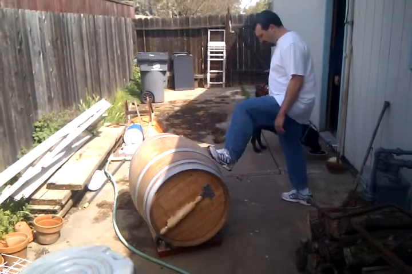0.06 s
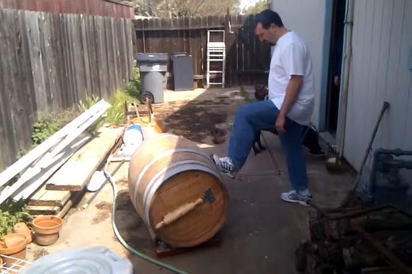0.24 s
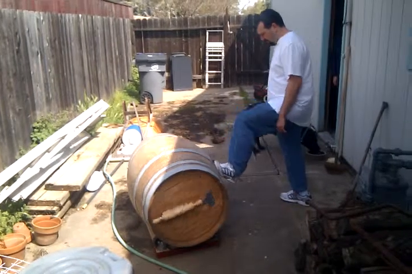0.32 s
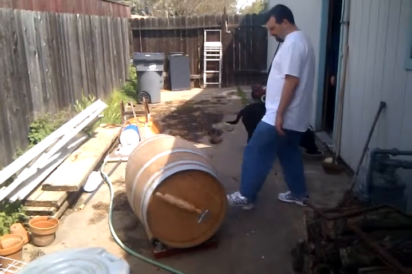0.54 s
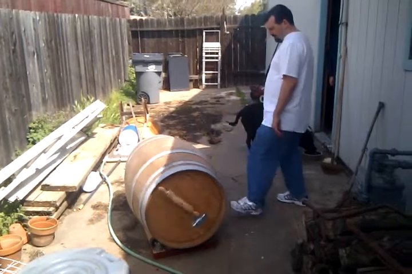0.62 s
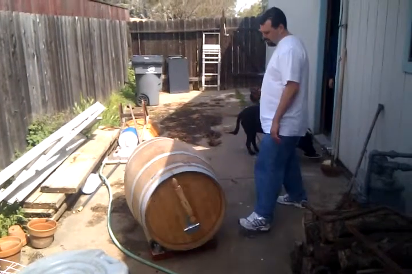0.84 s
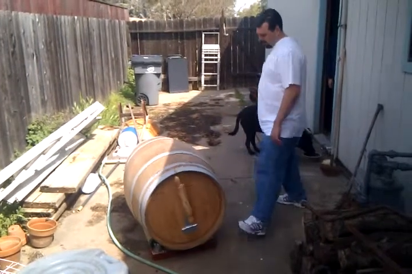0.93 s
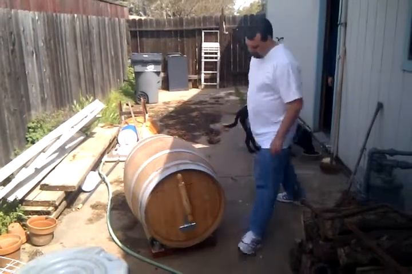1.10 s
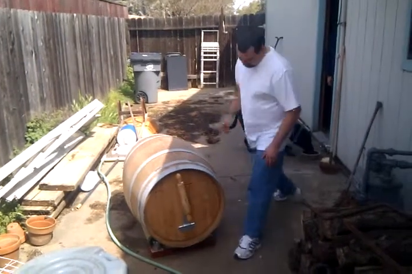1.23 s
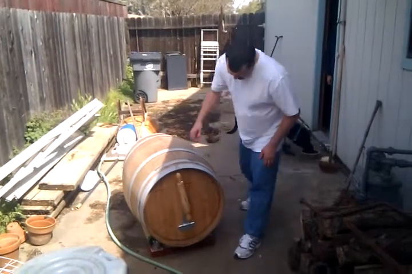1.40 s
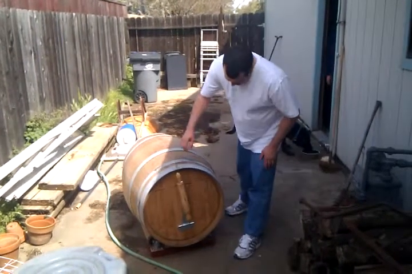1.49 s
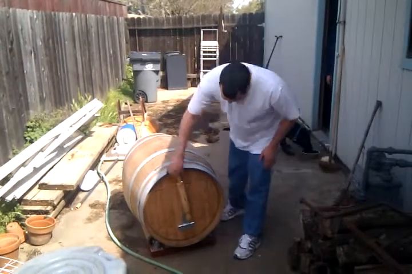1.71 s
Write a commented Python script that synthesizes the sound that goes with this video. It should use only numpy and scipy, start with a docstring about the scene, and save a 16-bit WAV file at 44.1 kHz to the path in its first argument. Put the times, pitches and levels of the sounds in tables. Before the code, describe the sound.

Hollow rumbling and thumping of a wooden barrel turning on its stand, with scuffing shoes.

```python
"""A hollow rumble swells over a faint motor hum: a wooden barrel, pushed by a foot, turns on its cradle.
It grinds, thumps against the support and stops with a clack, each contact exciting damped modes of
its body, staves and hoops. Shoes scuff the concrete by friction, during the roll and after it.
The narrow back yard adds short echoes, and a narrow-band recorder clips the highest peaks."""
import sys
import numpy as np
from scipy import signal
from scipy.fft import rfft, irfft
from scipy.io import wavfile
from scipy.ndimage import uniform_filter1d

SR = 44100
rng = np.random.default_rng(int(sys.argv[2]) if len(sys.argv) > 2 else 0)


def dump(signal):
    """Clip the signal to [-1, 1] and save it as 16-bit WAV at the path in sys.argv[1]."""
    limited = np.clip(np.atleast_2d(signal).T, -1, 1)
    pcm = np.round(limited * 32767).astype(np.int16)
    wavfile.write(sys.argv[1], SR, pcm)


N = 77175
T = np.arange(N) / SR

# Spectrum of the outdoor noise: f/Hz, relative level/dB
AIR_SPECTRUM = [(25, -46.5), (60, -12), (140, -13.5), (200, -4), (290, -3.5), (390, -2.5), (520, 1),
                (700, -2), (1050, -5.5), (1300, -3), (1700, -7.5), (2100, -12), (3200, -16.5), (3700, -15),
                (4400, -26.5)]
# Partials of the motor: f/Hz, level/dB
MOTOR_PARTIALS = [(291, -52.5), (698.5, -51), (721, -53.5), (1047, -48), (1164, -54.5), (1395, -60)]
# Envelope of the soft shuffling: t/s, level/dB
SHUFFLE_ENVELOPE = [(1.38, -82), (1.45, -44.5), (1.51, -39), (1.57, -59), (1.64, -36), (1.70, -42),
                    (1.75, -47)]
# Spectrum of the shuffling: f/Hz, relative level/dB
SHUFFLE_SPECTRUM = [(200, -19), (450, -41.5), (720, 11.5), (1100, -9.5), (1650, 7), (2300, -12.5),
                    (4000, -26)]
# Shoes scuffing and landing: t/s, length/s, sole f/Hz, sole level/dB, rasp level/dB, release/s
SCUFFS = [(.065, 0.0086, 1030, -33, -46, 0.012), (0.422, 0.0076, 934.3, -18, -30.5, 0.0066),
          (.983, 0.021, 993, -32, -33.5, 0.0078), (1.392, 0.008, 976, -29.5, -32.5, 0.03),
          (1.601, 0.021, 758, -43, -34.5, .018), (1.726, 0.003, 1000, -36, -30, 0.016)]
# Rolling excitation: t/s, body rumble level/dB, stave grinding level/dB, edge grit level/dB
ROLL_ENVELOPE = [(0, -40, -39.5, -46.5), (.06, -41.5, -50.5, -52.5), (.09, -33.5, -31, -50.5),
                 (.135, -30.5, -45.5, -49), (.20, -33, -36.5, -47), (.25, -29.5, -35, -42.5),
                 (.29, -23.5, -29.5, -38.5), (.40, -20.5, -24.5, -45), (.445, -18.5, -20, -32.5),
                 (.50, -18.5, -26.5, -34.5), (.55, -26.5, -25.5, -42.5), (.65, -22, -23, -38),
                 (.69, -24.5, -27.5, -61.5), (.75, -26, -32.5, -37.5), (.785, -27, -22.5, -34.5),
                 (.865, -26, -28, -34.5), (.90, -34, -34, -41), (.97, -37, -36, -43),
                 (1.12, -57, -47, -50.5)]
# Knocks on the cradle: t/s, body level/dB, stave level/dB, edge level/dB
CRADLE_KNOCKS = [(0.135, -32, -37.5, -86), (0.206, -25.5, -43.5, -52.5), (0.278, -25, -33, -39.5),
                 (.351, -18, -29.5, -46), (.376, -13.5, -37, -37.5), (.432, -14.5, -14.5, -28.5),
                 (0.444, -28.5, -20.5, -33), (0.463, -19, -27, -16.5), (.472, -16.5, -14.5, -28),
                 (.482, -22.5, -17.5, -26), (.494, -16, -23.5, -31), (.507, -22, -19.5, -26),
                 (.521, -22, -20, -37), (0.572, -21, -31.5, -40.5), (.636, -26, -30, -31.5),
                 (.722, -18, -32.5, -41.5), (.848, -31, -27.5, -21.5), (.866, -24.5, -26, -33)]
# Modes of the hollow body and heads: f/Hz, relative level/dB, T60/s
BODY_RESONANCES = [(64, -23, 0.072), (124, -21.5, 0.073), (227.8, -4, 0.079), (276.1, -0.5, 0.099),
                   (319, -2, 0.067), (398, -5.5, 0.032)]
# Modes of the staves: f/Hz, relative level/dB, T60/s
STAVE_RESONANCES = [(433.4, -6.5, 0.12), (520, -12, 0.028), (552, 0.5, .05), (605, -2, 0.062),
                    (674.6, 4.5, 0.034), (760, 3, .06), (780, -8, 0.042), (918, 2, .06),
                    (967.8, -3.5, 0.18), (1039, 0.5, .05), (1152, -9, 0.069), (1470, -1.5, 0.066),
                    (1632, -4, 0.09), (1785, -5.5, 0.022)]
# Modes of the hoops and hard edges: f/Hz, relative level/dB, T60/s
EDGE_RESONANCES = [(2210, -23, 0.076), (2465, 8, 0.072), (2559, 15, 0.013), (2810, -2, .03),
                   (3126, 10.5, 0.017), (3387, 0.5, .03)]


def amp(db):
    """Amplitude grows tenfold for every 20 dB."""
    return 10 ** (np.asarray(db) / 20)


def unit_rms(x):
    """Normalisation to a mean power of 1."""
    return x / np.sqrt(np.mean(x ** 2))


def unit_energy(x):
    """Normalisation to a total energy of 1."""
    return x / np.sqrt(np.sum(x ** 2))


def envelope(table, column=1):
    """Gain over time, by linear interpolation of one column of levels."""
    rows = np.array(table)
    return amp(np.interp(T, rows[:, 0], rows[:, column]))


def decay(t60):
    """Exponential damping: a fall of 60 dB in t60 seconds."""
    return np.exp(-np.log(1000) * T / t60)


def ring(force, response):
    """A linear system convolves its input with its impulse response."""
    return signal.fftconvolve(force, response)[:N]


def band_noise(lo_hz, hi_hz):
    """Band-pass filtering of white noise, at rms 1."""
    band = signal.butter(2, [lo_hz, hi_hz], "band", fs=SR, output="sos")
    return unit_rms(signal.sosfilt(band, rng.standard_normal(N)))


def coloured_noise(spectrum):
    """Spectral shaping of white noise, at rms 1."""
    hz, db = np.array(spectrum).T
    bins_hz = np.maximum(np.arange(N // 2 + 1) * SR / N, 1)
    gain = amp(np.interp(np.log(bins_hz), np.log(hz), db))
    return unit_rms(irfft(rfft(rng.standard_normal(N)) * gain, N))


def wander(per_s):
    """Moving averages smooth random steps into a drift of rms 1."""
    span = int(SR / per_s)
    steps = np.repeat(rng.standard_normal(N // span + 1), span)[:N]
    return unit_rms(uniform_filter1d(uniform_filter1d(steps, span), span))


def impulses(per_s, spread_db):
    """A Poisson process: independent impulses of uneven size and random sign, at rms 1."""
    size = amp(spread_db * np.minimum(rng.exponential(size=N), np.pi))
    occurs = rng.random(N) < per_s / SR
    return unit_rms(occurs * size * np.sign(rng.standard_normal(N)))


def outdoor_air():
    """Broadband ambient noise with slight random amplitude modulation."""
    return coloured_noise(AIR_SPECTRUM) * amp(-40 - .45 * wander(per_s=12))


def motor_hum(drift_hz=1.53):
    """A distant motor radiates a line spectrum; each partial wavers in frequency and level."""
    hum = np.zeros(N)
    for hz, db in MOTOR_PARTIALS:
        phase = 2 * np.pi * np.cumsum(hz + drift_hz * wander(per_s=5.54)) / SR
        hum += np.sqrt(2) * amp(db - wander(per_s=11)) * np.sin(phase)
    return hum


def yard(direct, echo_db=-21, delay_s=.009, low_cut_hz=370):
    """Reflection from fence and house wall adds scattered echoes, thin in the bass."""
    echoes = impulses(per_s=1500, spread_db=3) * (T > delay_s) * decay(t60=.46)
    echoes = signal.sosfilt(signal.butter(2, low_cut_hz, "high", fs=SR, output="sos"), echoes)
    return direct + amp(echo_db) * ring(direct, unit_energy(echoes))


def shuffling():
    """Light sliding friction of the shoes makes a soft noise that swells and fades."""
    return coloured_noise(SHUFFLE_SPECTRUM) * envelope(SHUFFLE_ENVELOPE)


def scuffs(attack_s=.0015, drift_hz=60, half_band_hz=275, rasp_fade_s=.072):
    """Friction on concrete draws a hollow squawk from the sole and a sandy rasp that fades first."""
    out = np.zeros(N)
    for start, length, hz, sole_db, rasp_db, release in SCUFFS:
        age = np.maximum(T - start, 0)
        shape = np.minimum(age / attack_s, 1) * np.exp(-np.maximum(age - length, 0) / release)
        phase = 2 * np.pi * np.cumsum(hz + drift_hz * wander(per_s=300)) / SR
        rubbing = band_noise(hz - half_band_hz, hz + half_band_hz)
        sole = unit_rms(unit_rms(np.sin(phase)) + amp(-3) * rubbing)
        rasp = band_noise(2340, 3740) * np.exp(-age / rasp_fade_s)
        out += shape * (amp(sole_db) * sole + amp(rasp_db) * rasp)
    return out


def knocks(column, chatter_s=.004, span_s=.015):
    """Each impact on the cradle is an impulsive force followed by brief contact chatter."""
    force = np.zeros(N)
    for knock in CRADLE_KNOCKS:
        blow = amp(1) * unit_energy(rng.standard_normal(N) * np.exp(-T / chatter_s))
        blow[0] = 1  # the first sharp contact
        start = int(knock[0] * SR)
        strength = amp(knock[column]) * np.sqrt(span_s * SR)  # energy of this level held for span_s
        force[start:] += strength * unit_energy(blow)[:N - start]
    return force


def barrel_part(contacts, column, modes, dense_db, dense_hz):
    """Modal superposition: rolling and knocks drive damped sines; a noise band stands for dense modes."""
    force = contacts * envelope(ROLL_ENVELOPE, column) + knocks(column)
    response = sum((-1) ** k * amp(db) * np.sin(2 * np.pi * hz * T) * decay(t60)
                   for k, (hz, db, t60) in enumerate(modes))
    main_modes = ring(force, unit_energy(response))
    stored_energy = np.abs(ring(force ** 2, unit_energy(decay(t60=.051)) ** 2))
    dense_modes = band_noise(*dense_hz) * np.sqrt(stored_energy)
    return (main_modes + amp(dense_db) * dense_modes) / np.hypot(1, amp(dense_db))


def barrel():
    """Forced vibration: irregular contacts ring the hollow body, the staves and the hard edges."""
    bumps = impulses(per_s=970, spread_db=3.5)
    grit = impulses(per_s=710, spread_db=1.5)
    body = barrel_part(bumps, column=1, modes=BODY_RESONANCES, dense_db=-6, dense_hz=(230, 381))
    staves = barrel_part(bumps, column=2, modes=STAVE_RESONANCES, dense_db=.5, dense_hz=(450, 1343))
    edges = barrel_part(grit, column=3, modes=EDGE_RESONANCES, dense_db=4.5, dense_hz=(1400, 3200))
    return body + staves + edges


def scene():
    """Superposition: barrel and shoes echo in the yard over the air and the motor."""
    return (yard(barrel() + shuffling() + scuffs()) + outdoor_air() + motor_hum())[None]


def record(dry, low_cut_hz=42, rolloff_hz=3416, band_hz=4522, clip_level=.7, top_hz=15800):
    """Band limiting and overload: the recorder cuts deep bass and treble, then clips the highest peaks."""
    x = signal.sosfilt(signal.butter(2, low_cut_hz, "high", fs=SR, output="sos"), dry)
    x = signal.sosfilt(signal.butter(10, rolloff_hz, fs=SR, output="sos"), x)
    x = signal.sosfilt(signal.ellip(8, .2, 70, band_hz, fs=SR, output="sos"), x)
    x = np.clip(x, -clip_level, clip_level)
    return signal.sosfilt(signal.ellip(8, .2, 70, top_hz, fs=SR, output="sos"), x)


dry = scene()
out = record(dry)
dump(out)
```